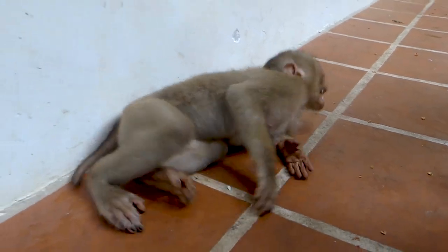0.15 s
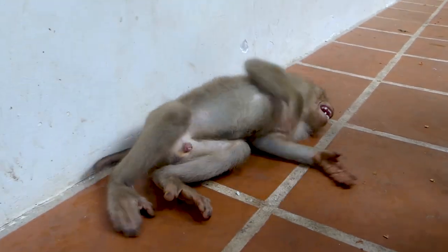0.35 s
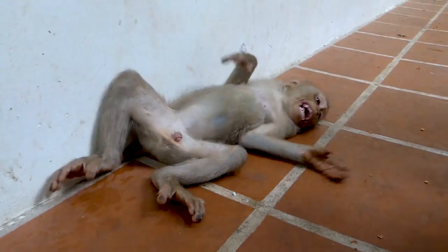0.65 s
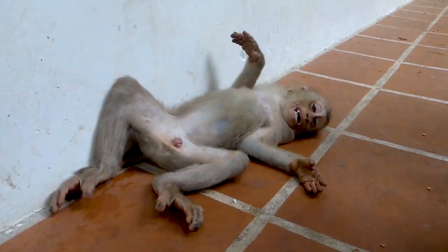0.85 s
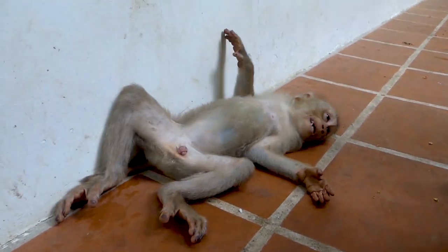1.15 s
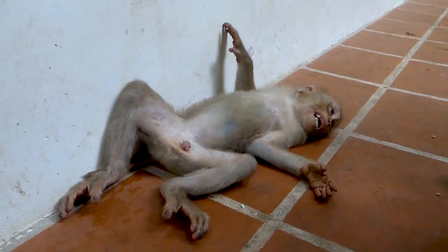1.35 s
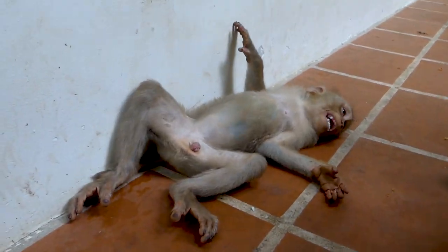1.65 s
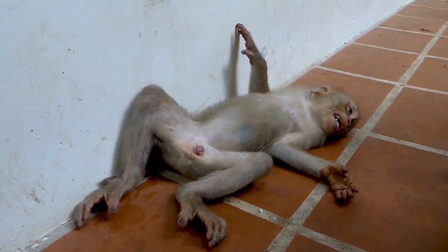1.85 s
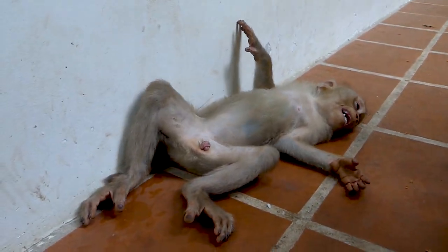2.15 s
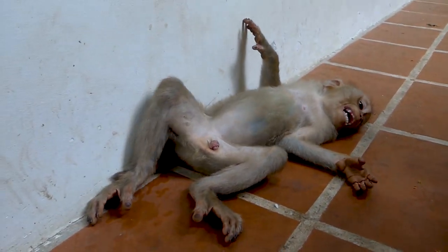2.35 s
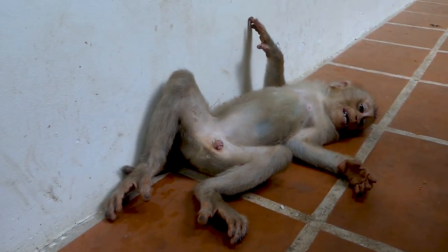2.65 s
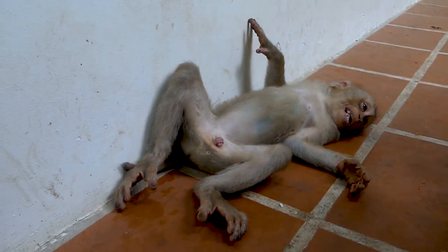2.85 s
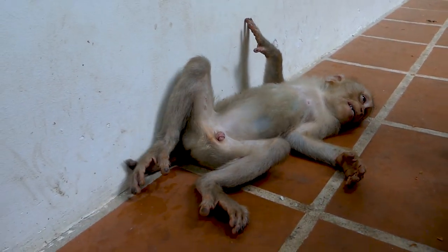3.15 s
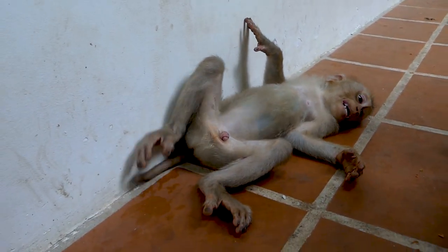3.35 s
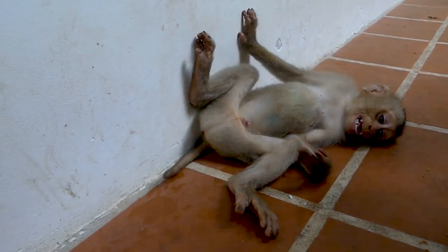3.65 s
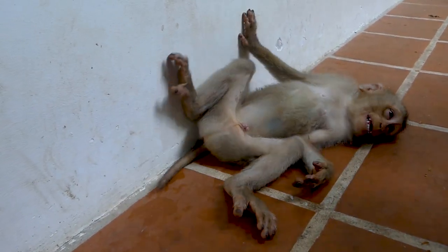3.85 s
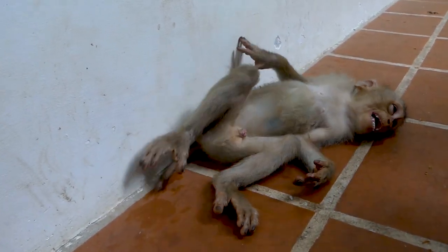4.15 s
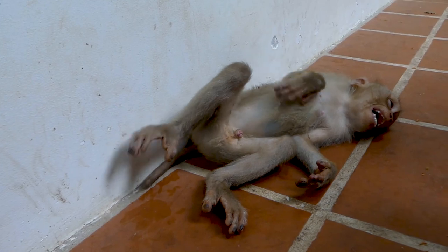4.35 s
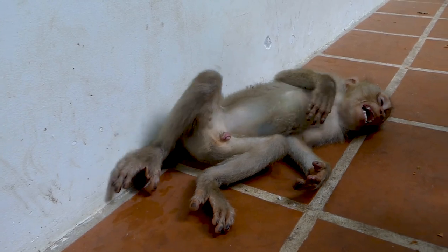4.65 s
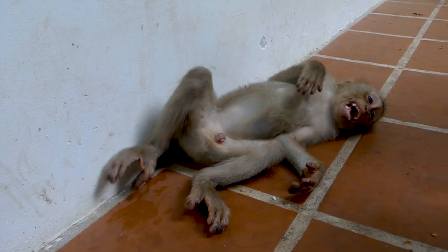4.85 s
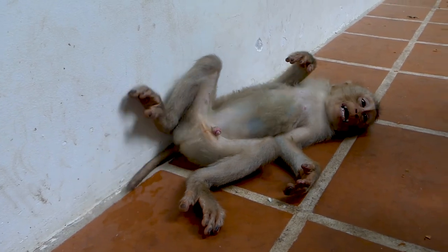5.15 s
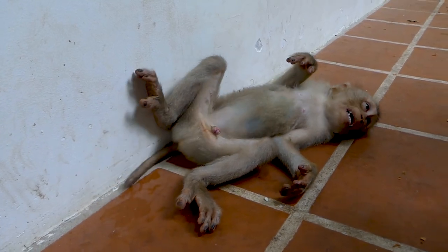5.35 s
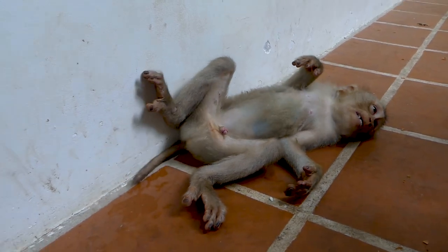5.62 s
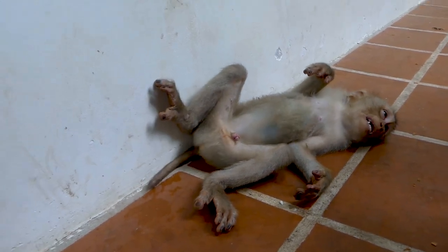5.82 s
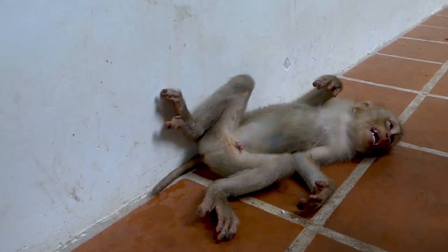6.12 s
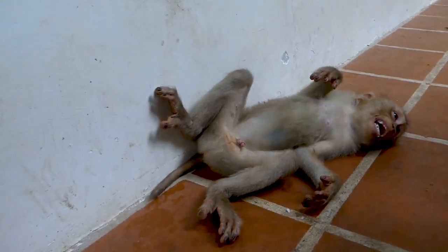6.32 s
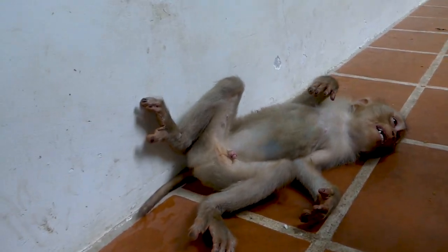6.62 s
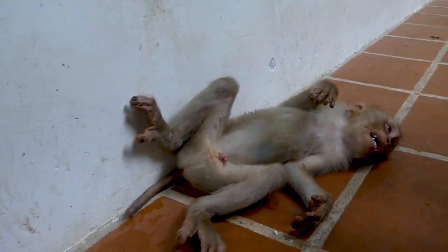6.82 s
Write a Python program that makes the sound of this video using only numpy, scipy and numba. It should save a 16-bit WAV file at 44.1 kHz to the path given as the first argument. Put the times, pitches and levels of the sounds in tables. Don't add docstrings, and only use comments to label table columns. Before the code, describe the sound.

Piercing, raspy infant monkey screams burst again and again, cracking between whistle, buzz and rough shriek, with faint machinery hum in a hard room.

```python
import sys
import numpy as np
from scipy import signal
from scipy.fft import rfft, irfft, next_fast_len
from scipy.io import wavfile
from numba import njit

SR = 44100
rng = np.random.default_rng(int(sys.argv[2]) if len(sys.argv) > 2 else 0)


def generate_wav(sig):
    pcm = np.round(np.clip(np.atleast_2d(sig).T, -1, 1) * 32767).astype(np.int16)
    wavfile.write(sys.argv[1], SR, pcm)


def magnitude_from_level(level_db):
    exponent = np.asarray(level_db, float) / 20
    return 10 ** exponent


N = 307729


def at_hz(points, hz):
    table_hz, value = np.array(points).T
    return np.interp(np.log(hz + 1), np.log(table_hz), value)


def rms_one(x):
    return x / np.sqrt(np.mean(x ** 2) + 1e-20)


def drift(rate_hz):
    r = np.exp(-2 * np.pi * rate_hz / SR)
    noise = rng.standard_normal(N + 20000)
    return rms_one(signal.lfilter([1], [1, -2 * r, r * r], noise)[20000:])


def resonances(x, modes):
    out = 0
    for k, (hz, width_hz, level_db) in enumerate(modes):
        r = np.exp(-np.pi * width_hz / SR)
        poles = [1, -2 * r * np.cos(2 * np.pi * hz / SR), r * r]
        gain = (-1) ** k * magnitude_from_level(level_db) * (1 - r * r) / 2
        out = out + gain * signal.lfilter([1, 0, -1], poles, x)
    return out


@njit
def moving_resonance(x, hz, r):
    y = np.zeros(len(x))
    for i in range(2, len(x)):
        turn = 2 * r * np.cos(2 * np.pi * hz[i] / SR)
        y[i] = x[i] - x[i - 2] + turn * y[i - 1] - r * r * y[i - 2]
    return y


def coloured(x, gain):
    size = next_fast_len(N + SR)
    hz = np.arange(size // 2 + 1) * SR / size
    return irfft(rfft(x, size) * gain(hz), size)[..., :N]


# hz, level_db_per_hz
HUM_SPECTRUM = [(15, -62.5), (25, -31.5), (154, 0), (214, -11.5), (510, -7.5), (553, -9), (1980, -21.5),
                (3320, -23), (3910, -26), (4730, -46.5), (5270, -19.5), (8370, -46), (13300, -54),
                (15200, -41.5), (16500, -51)]
# time_s, level_db
HUM_LEVEL = [
    (0.0, -54),
    (0.55, -52.5),
    (1.2, -55),
    (2.8, -52),
    (4.0, -51),
    (4.3, -54.5),
    (5.2, -56.5),
    (5.83, -51),
    (6.98, -53.5),
]


def hum():
    air = rng.standard_normal(N) + rng.standard_normal((2, N))
    tone = rms_one(coloured(air, lambda hz: magnitude_from_level(at_hz(HUM_SPECTRUM, hz))))
    load_db = np.interp(np.arange(N) / SR, *np.transpose(HUM_LEVEL))
    return tone * magnitude_from_level(load_db + 1.3 * drift(1.5))


# time_s, level_db
LIMB_DRAG = [(0.0, -53), (0.29, -52), (0.9, -60.5), (2.35, -54), (3.34, -60), (3.5, -44), (3.75, -61),
             (4.22, -56), (5.07, -62.5), (5.83, -65), (6.24, -57.5), (6.98, -60.5)]


def rustle():
    scrapes = rng.standard_normal((2, N))
    bright = rms_one(resonances(scrapes, [(3800, 1800, -1.5), (7400, 1100, -1), (11540, 15000, -8)]))
    drag_db = np.interp(np.arange(N) / SR, *np.transpose(LIMB_DRAG))
    return bright * magnitude_from_level(drag_db - 1.5 + 0.83 * drift(25))


# hz, t60_s
TAIL_T60 = [(300, .5), (1500, 0.39), (4000, 0.49), (8000, 0.51), (15000, 0.11)]
# hz, width_hz, level_db
TAIL_COLOUR = [(3826, 330, 9), (2440, 11200, -1)]


def room(x):
    t, size = np.arange(SR) / SR, next_fast_len(N + SR)
    near_t60_s, near_db, far_db = 0.11, -5, -25
    near = np.diff(rng.standard_normal((2, SR)), prepend=0) * magnitude_from_level(-60 * t / near_t60_s) * (t > .001)
    far, white = 0, rng.standard_normal((2, SR))
    edges_hz = 250 * 2 ** np.arange(0, 6.6, .5)
    for low_hz, high_hz in zip(edges_hz, edges_hz[1:]):
        sos = signal.butter(2, [low_hz, min(high_hz, .45 * SR)], "band", fs=SR, output="sos")
        decay = magnitude_from_level(-60 * t / at_hz(TAIL_T60, np.sqrt(low_hz * high_hz)))
        far = far + signal.sosfilt(sos, white) * decay * (t > .012)
    echo = magnitude_from_level(near_db) * rms_one(near) + magnitude_from_level(far_db) * rms_one(resonances(far, TAIL_COLOUR))
    return x + irfft(rfft(x, size) * rfft(echo / np.sqrt(SR), size), size)[:, :N]


# time_s, peak_db
FOLD_SNAPS = [(0.9826, -29), (1.3821, -23), (1.386, -26), (1.6871, -32), (1.762, -17), (2.001, -18),
              (2.0753, -12), (2.363, -15), (2.9043, -7.5), (3.568, -26), (3.9695, -3.5), (3.989, -12.5),
              (4.5075, -16), (4.512, -15), (5.2659, -24), (5.2712, -18), (5.773, -10.5), (5.7775, -14),
              (5.7818, -28), (6.0158, -38), (6.715, -43), (6.0723, -9), (6.356, -31.5), (6.7674, -8.5),
              (6.7636, -19)]


def snaps():
    clicks = np.zeros(N)
    for time_s, peak_db in FOLD_SNAPS:
        clicks[round(time_s * SR)] = magnitude_from_level(peak_db - 5.5)
    puffs = signal.lfilter([1], [1, -.96], clicks) * np.tanh(rng.standard_normal(N))
    return resonances(puffs, [(2280, 1100, 7), (3700, 910, -5), (6200, 4300, 7.5),
                              (9100, 1700, 12.5), (12500, 3000, 3.5)])


# hz, width_hz, level_db
UPPER_THROAT = [(4750, 740, 3.5), (5635, 1340, 3.5), (7570, 1100, 2), (8870, 310, -6)]
# hz, width_hz, level_db
TEETH_HISS = [(10680, 1370, 11.5), (12200, 670, -3.5), (13500, 1500, -2.5)]


def notes(table, wobble, flutter_db, edge_s, air_db):
    out = np.zeros(N)
    pitch, strength = np.exp(wobble * drift(220)), magnitude_from_level(flutter_db * drift(90))
    air = magnitude_from_level(air_db) * rms_one(resonances(rng.standard_normal(N), UPPER_THROAT + TEETH_HISS))
    k = np.arange(1, 11)[:, None]
    for start_s, end_s, start_hz, end_hz, level_db, second_db in table:
        span = np.arange(round(start_s * SR), round(end_s * SR))
        hz = np.geomspace(start_hz, end_hz, len(span)) * pitch[span]
        phase = 2 * np.pi * np.cumsum(hz) / SR
        edge = np.clip(np.minimum(span / SR - start_s, end_s - span / SR) / edge_s, 0, 1)
        partial_db = np.where(k == 1, 0, second_db - 5 * (k - 2))
        partial = magnitude_from_level(partial_db) * (k * hz < .36 * SR)
        tone = np.sum(partial * np.sin(k * phase + k * k), axis=0)
        out[span] += np.sqrt(2) * magnitude_from_level(level_db) * edge * strength[span] * (tone + air[span])
    return out


def glided(table, ratio):
    return [(start_s, end_s, hz, hz * ratio, level_db, second_db)
            for start_s, end_s, hz, level_db, second_db in table]


# start_s, end_s, start_hz, end_hz, level_db
GLIDING_WHISTLES = [
    (0.98, 0.987, 8400, 6040, -33),
    (1.384, 1.406, 3290, 2870, -27),
    (2.373, 2.385, 3700.0, 3880, -30.5),
    (2.444, 2.466, 3700, 3150, -38.5),
    (3.625, 3.669, 1590, 2270, -43.5),
    (5.276, 5.294, 3614, 3230, -28),
    (6.055, 6.071, 3490, 3015, -22),
    (6.368, 6.378, 3590, 3830, -29),
    (6.757, 6.778, 3700, 3270, -30.5),
]
# start_s, end_s, pitch_hz, level_db, second_db
STEADY_PIPS = [
    (1.74, 1.763, 3700, -29, -5),
    (2.06, 2.075, 4030, -30, 1),
    (2.902, 2.913, 3177, -28, -1.5),
    (3.304, 3.314, 2960, -17.5, -8.5),
    (3.573, 3.581, 3430, -24.5, -24),
    (3.955, 3.969, 3360, -20.5, -18.5),
]


def whistles():
    table = [(*row, -10.5) for row in GLIDING_WHISTLES] + glided(STEADY_PIPS, 0.99)
    return notes(table, wobble=.006, flutter_db=1.5, edge_s=.003, air_db=-16)


# start_s, end_s, pitch_hz, level_db, second_db
SHAKY_WHISTLES = [(0.097, 0.15, 3604, -27.5, -40), (0.14, 0.175, 4230, -31, -38),
                  (0.188, 0.202, 4970, -32, -26), (0.385, 0.43, 3960, -31, -41),
                  (0.655, 0.72, 3810, -30, -40), (0.997, 1.07, 3497, -30.5, -17),
                  (1.401, 1.416, 2715, -20.5, -7.5), (1.765, 1.78, 4730, -41, -37),
                  (2.416, 2.448, 3836, -33, 0.5), (3.357, 3.378, 4870, -36, -39),
                  (3.582, 3.598, 3050, -26, -17), (3.6, 3.62, 3106, -19.5, -16.5),
                  (3.62, 3.668, 3610, -41.5, -11), (4.24, 4.285, 3965, -35.5, -22.5),
                  (4.25, 4.275, 4770, -30, -21.5), (4.295, 4.33, 3950, -35, -35),
                  (4.89, 4.92, 4100, -30.5, -0.5)]


def worn_whistles():
    return notes(glided(SHAKY_WHISTLES, 1), wobble=.02, flutter_db=3, edge_s=.004, air_db=-20)


# start_s, end_s, pitch_hz, level_db, second_db
HELD_BUZZES = [(0.16, 0.18, 1750, -44, -15), (5.292, 5.33, 1900, -33, -12), (0.41, 0.465, 1683, -41.5, -6),
               (0.657, 0.68, 865, -43, -23), (0.7, 0.75, 399, -51.5, -11), (1.44, 1.485, 1336, -42, -1.5),
               (2.011, 2.023, 910, -44, -12), (3.514, 3.558, 1320, -55.5, -15),
               (3.972, 3.99, 1000.0, -53.5, 28.5), (4.29, 4.34, 1970, -39.5, 3.5),
               (4.6, 4.635, 2356, -44.5, -11), (4.885, 4.945, 1745, -51, -14),
               (5.232, 5.275, 1612, -62, -24), (5.825, 5.857, 905, -36.5, -9.5),
               (6.11, 6.155, 1220, -50, -4), (6.42, 6.44, 1680, -44, -8), (6.418, 6.442, 2305, -36, -10)]
# start_s, end_s, start_hz, level_db, second_db
SINKING_BUZZES = [
    (2.94, 2.978, 1078, -35.0, -3.5),
    (3.33, 3.356, 1034, -37, 8.5),
    (4.246, 4.331, 386.4, -52.5, -8.5),
    (5.3, 5.36, 1200, -44, 1.5),
    (6.071, 6.108, 1178, -45, 16),
    (6.78, 6.835, 1030, -37, -21),
]
# start_s, end_s, start_hz, level_db, second_db
PLUNGING_BUZZES = [
    (2.913, 2.94, 1370, -41, 8),
    (4.505, 4.55, 590, -51, -4),
    (4.85, 4.876, 641, -47, -14),
    (5.782, 5.824, 1148, -36.5, 2),
]


def buzzy_notes():
    falling = glided(SINKING_BUZZES, .86) + glided(PLUNGING_BUZZES, .73)
    return notes(glided(HELD_BUZZES, 1) + falling, wobble=.014, flutter_db=3, edge_s=.007, air_db=-16)


def chaotic_folds(per_s, jitter, size_db, breath):
    rate = per_s * np.exp(jitter * drift(700))
    struck = np.diff(np.floor(np.cumsum(rate / SR)), prepend=0) > 0
    slaps = struck * magnitude_from_level(size_db * rng.standard_normal(N))
    slaps = slaps / np.sqrt(rate)
    puffs = signal.lfilter([1], [1, -.97], slaps) * rng.standard_normal(N)
    return rms_one(rms_one(slaps - slaps.mean()) + breath * rms_one(puffs))


def restless(x, modes, sway, patchy_db):
    out = 0
    for hz, width_hz, level_db in modes:
        centre_hz = hz * np.exp(sway * drift(11.7))
        band = moving_resonance(x, centre_hz, np.exp(-np.pi * width_hz / SR))
        out = out + rms_one(band) * magnitude_from_level(level_db + patchy_db * drift(35))
    return rms_one(out)


# low_throat_db, mouth_db, high_throat_db, hiss_db
RISE_LOSS = [18, 22, 11.8, 3.5]
SAG_LOSS = [6.56, 7.5, 6.14, 17.7]
FADE_LOSS = [20.6, 17, 23, 31]


def stretch(row, shape):
    start_s, end_s, effort_db, hz, bright_db = row
    attack_s, hold, rise, sag, low_db = shape
    length_s = end_s - start_s
    low_db = low_db - 6.5 * (hz / 1000 - 3)
    high_db = 2.5 + 0.33 * bright_db
    peak_db = effort_db + np.array([low_db, 0, high_db, bright_db])
    time_s = np.array([start_s, start_s + attack_s, start_s + np.clip(hold, .4, .95) * length_s, end_s])
    loss_db = np.array([rise * np.array(RISE_LOSS), np.zeros(4), sag * np.array(SAG_LOSS), FADE_LOSS])
    mouth_hz = hz + 0.44 * (4200 - hz) * (time_s - start_s) / length_s
    return np.column_stack([time_s, peak_db - loss_db, mouth_hz])


# attack_s, hold_share, rise_depth, sag_depth, low_throat_db
FULL_BURSTS = [(1.401, 1.485, -23.5, 3160, -7.5), (1.763, 1.8, -31, 3870, -7),
               (2.075, 2.125, -27.5, 3930, 5), (2.384, 2.44, -24, 3330, 0.2), (2.45, 2.475, -41, 3000, -1),
               (3.314, 3.327, -20.5, 3000, -7), (3.332, 3.385, -26.5, 3300, -0.5),
               (5.29, 5.35, -21.5, 3000, 0.5), (6.071, 6.108, -22.5, 3370, 2.5),
               (6.353, 6.372, -39, 3550, 10), (6.774, 6.85, -24.5, 3540, -2)]
FULL_BURST_SHAPE = (.001, .6, .1, 1.38, -0.48)
QUICK_YELPS = [
    (0.648, 0.765, -27.5, 3940, 0.1),
    (0.992, 1.1, -24, 3140, -3.5),
    (1.684, 1.745, -22, 3250, -2),
    (2.008, 2.065, -22, 3230, -0.5),
    (3.571, 3.628, -23, 2960, -2),
    (4.237, 4.36, -28.5, 4200, 7.5),
    (4.505, 4.64, -29.5, 4000, 9),
]
QUICK_YELP_SHAPE = (.014, .6, .8, 1.05, -0.7)
SLOW_SWELLS = [
    (0.337, 0.46, -26.5, 3900, 0.41),
    (4.833, 4.96, -29.5, 4250, 4.9),
]
SLOW_SWELL_SHAPE = (.05, 0.71, 0.92, 1, -1.4)
HELD_SCREAMS = [
    (2.913, 2.975, -41.5, 3300, -5),
    (3.969, 4.07, -27.5, 3200, 1),
    (3.628, 3.675, -42, 3300, -5.5),
    (5.777, 5.8, -38.5, 3400, -6),
    (5.8, 5.86, -37, 3600, -7),
    (6.108, 6.155, -33, 3950, -3.5),
    (6.377, 6.46, -33, 4000, 4.5),
]
HELD_SCREAM_SHAPE = (0.03, .8, -0.6, 0.88, -1.5)
MOUTH_SHRIEKS = [
    (0.096, 0.203, -23.5, 3930, -8.5),
]
MOUTH_SHRIEK_SHAPE = (0.04, 1.4, 0.27, 1.3, -7.5)
# hz, width_hz, level_db
LOWER_THROAT = [(1000, 190, -25), (1480, 210, -5.5), (1906, 260, 6.5), (2345, 180, 10.5)]


def rasp():
    kinds = ((FULL_BURSTS, FULL_BURST_SHAPE), (QUICK_YELPS, QUICK_YELP_SHAPE),
             (SLOW_SWELLS, SLOW_SWELL_SHAPE), (HELD_SCREAMS, HELD_SCREAM_SHAPE),
             (MOUTH_SHRIEKS, MOUTH_SHRIEK_SHAPE))
    stretches = [stretch(row, shape) for table, shape in kinds for row in table]
    time_s, *columns = np.concatenate(sorted(stretches, key=lambda rows: rows[0, 0])).T
    t = np.arange(N) / SR
    low_db, mouth_db, high_db, hiss_db, mouth_hz = [np.interp(t, time_s, c) for c in columns]

    blown = np.zeros(N)
    for rows in stretches:
        blown[round(rows[0, 0] * SR):round(rows[-1, 0] * SR)] = 1
    opening = signal.lfilter([.04], [1, -.96], blown)
    dying = signal.lfilter([.004], [1, -.996], blown)
    gate = np.maximum(opening, dying)

    folds = chaotic_folds(per_s=1200, jitter=.3, size_db=2.5, breath=1.3)
    chest = rms_one(resonances(resonances(folds, [(328, 99, 1), (860, 450, 0)]), [(410, 370, 0)]))
    low = restless(resonances(folds, [(1800, 1400, 0)]), LOWER_THROAT, sway=.06, patchy_db=3)
    mouth = moving_resonance(folds, mouth_hz, np.exp(-np.pi * 650 / SR))
    mouth = rms_one(moving_resonance(mouth, mouth_hz * 1.254, np.exp(-np.pi * 2000 / SR)))
    high = restless(resonances(folds, [(7000, 5000, 0)]), UPPER_THROAT, sway=.04, patchy_db=3.5)
    hiss = restless(resonances(folds, [(11500, 6000, 0)]), TEETH_HISS, sway=.04, patchy_db=3.5)
    return gate * (magnitude_from_level(low_db) * (low + magnitude_from_level(-20) * chest)
                   + magnitude_from_level(mouth_db) * (mouth + magnitude_from_level(-39.5) * chest)
                   + magnitude_from_level(high_db) * high
                   + magnitude_from_level(hiss_db) * hiss)


def scene():
    voice = snaps() + whistles() + worn_whistles() + buzzy_notes() + rasp()
    return hum() + rustle() + room(magnitude_from_level(3.5) * voice)


def spliced(x):
    slip_s, fade_samples = .002, 200
    starts = np.cumsum(1024 * rng.integers(1, 3, 300)) - 1024
    lags = np.round(rng.normal(0, 1, 300) * slip_s * SR / 2)
    at = np.arange(N)
    now = np.searchsorted(starts, at, side="right").clip(1) - 1
    before = np.maximum(now - 1, 0)
    turn = np.clip((at - starts[now]) / fade_samples, 0, 1) * np.pi / 2
    out = np.zeros((2, N))
    for c, side in enumerate((1, -1)):
        old = x[c, (at - side * lags[before]).astype(int).clip(0, N - 1)]
        new = x[c, (at - side * lags[now]).astype(int).clip(0, N - 1)]
        out[c] = np.cos(turn) * old + np.sin(turn) * new
    return out


# hz, left_over_right_db
PORT_TILT = [(60, 5), (110, 10), (200, 8.5), (380, 3.5), (700, 1), (1290, -4), (2380, -3.5), (4400, 0),
             (8120, 0.0), (15000, 0.5)]


def unequal_ports(x):
    share = np.array([[.5], [-.5]])
    return coloured(x, lambda hz: magnitude_from_level(at_hz(PORT_TILT, hz) * share))


def roll_off(x):
    return signal.sosfilt(signal.butter(12, 16990, fs=SR, output="sos"), x)


def record(dry):
    ports = unequal_ports(spliced(dry))
    rounded = .8 * np.tanh(ports / .8)
    lowpass = signal.cheby2(10, 50, 17000, fs=SR, output="sos")
    cut = signal.sosfilt(lowpass, rounded)
    return roll_off(cut)


dry = scene()
out = record(dry)
generate_wav(out)
```